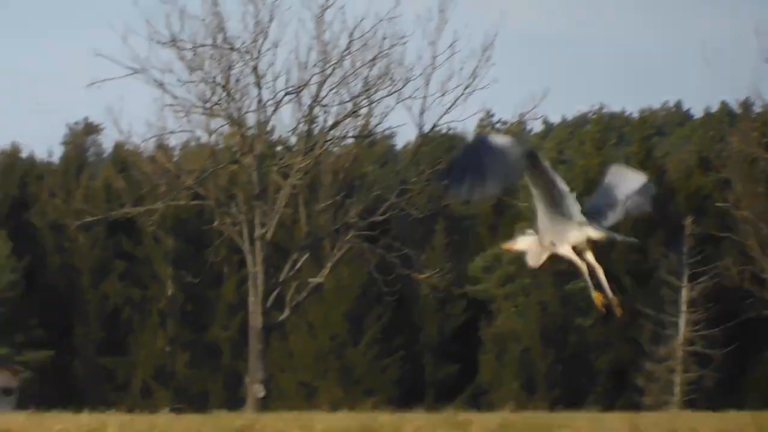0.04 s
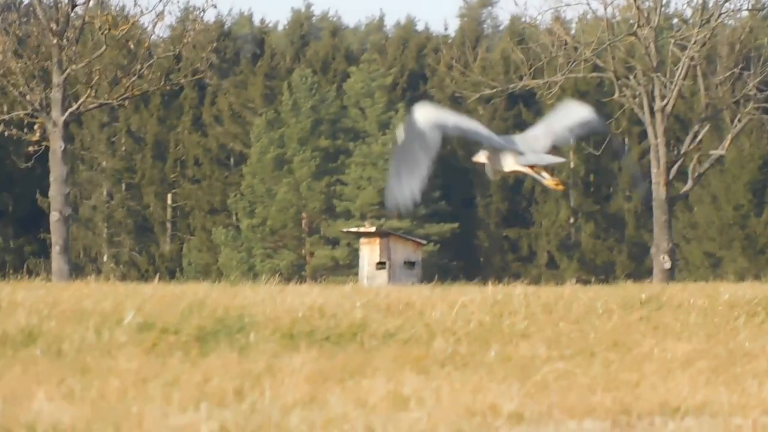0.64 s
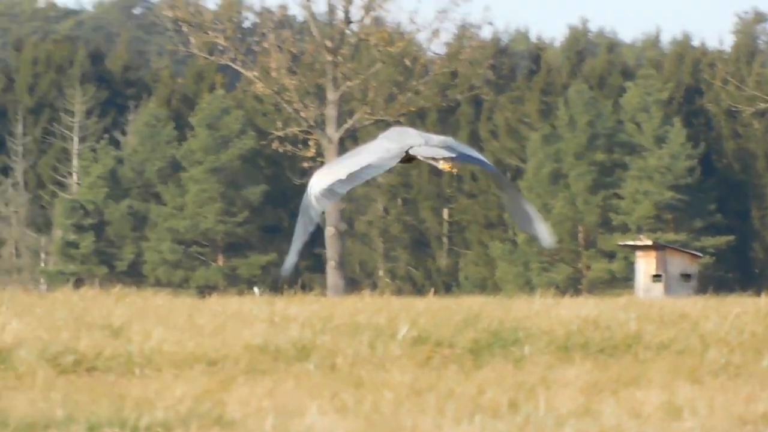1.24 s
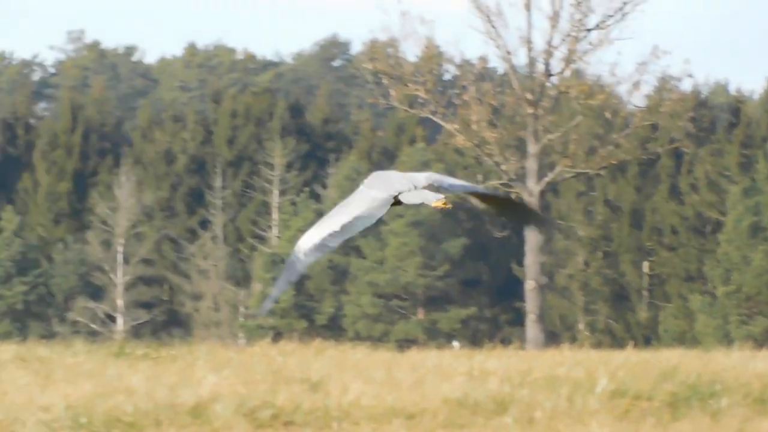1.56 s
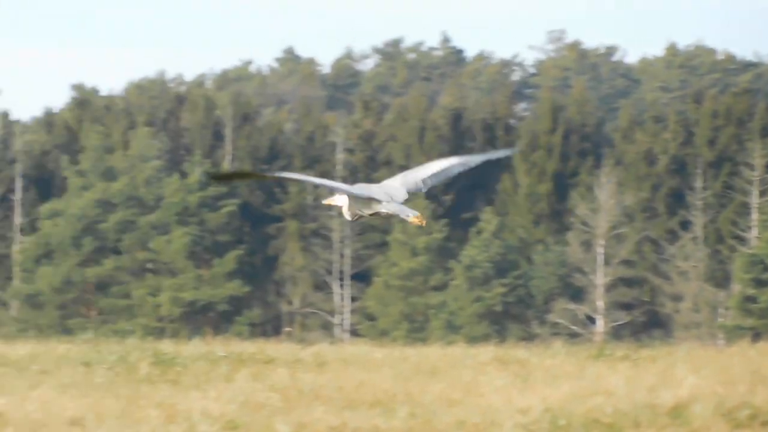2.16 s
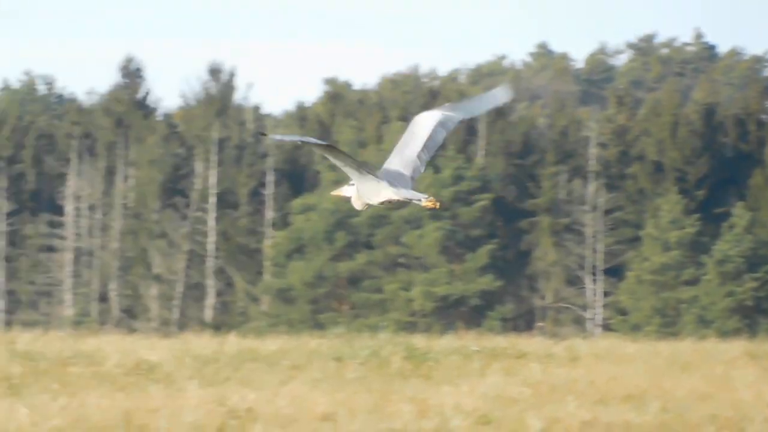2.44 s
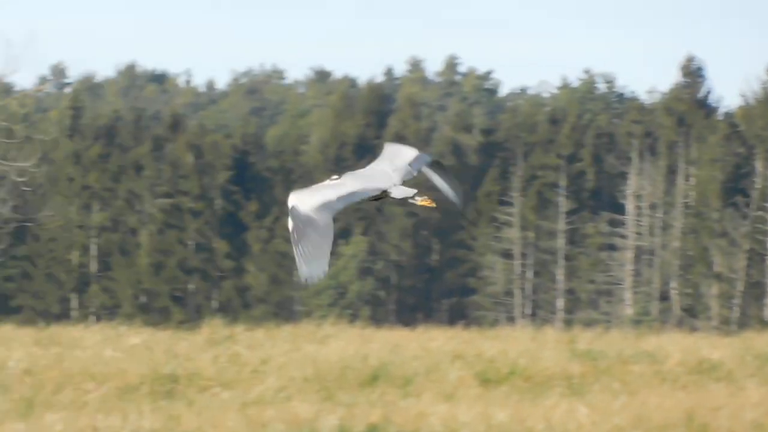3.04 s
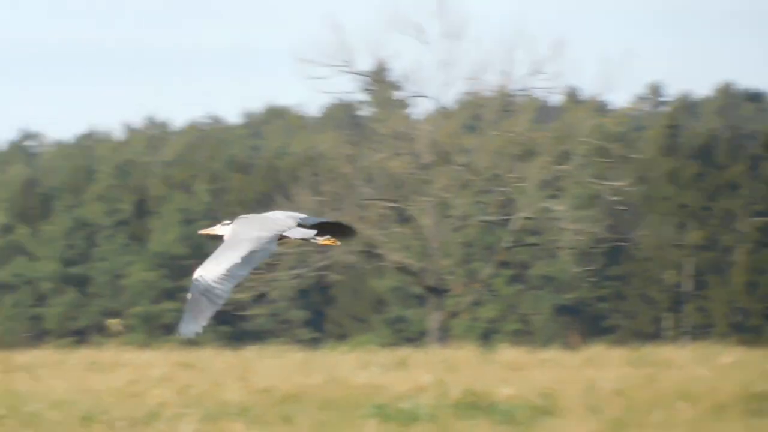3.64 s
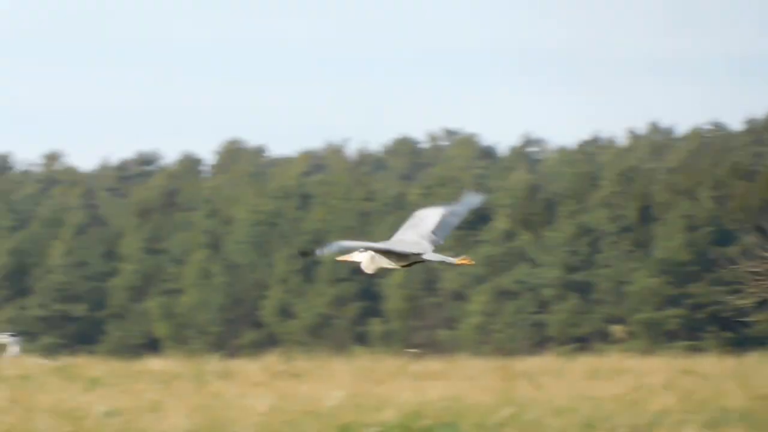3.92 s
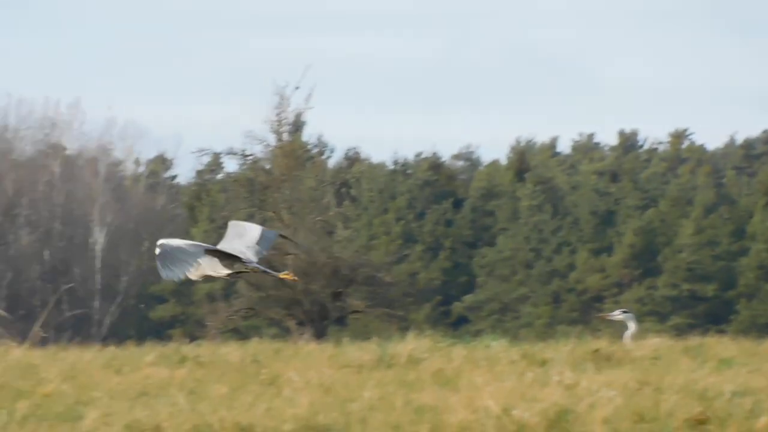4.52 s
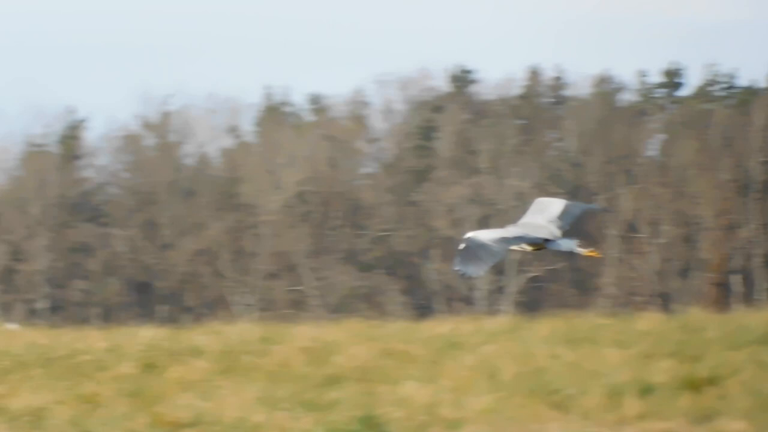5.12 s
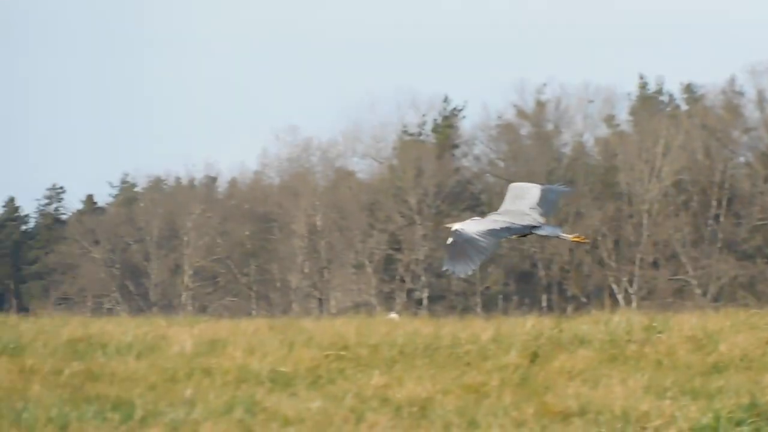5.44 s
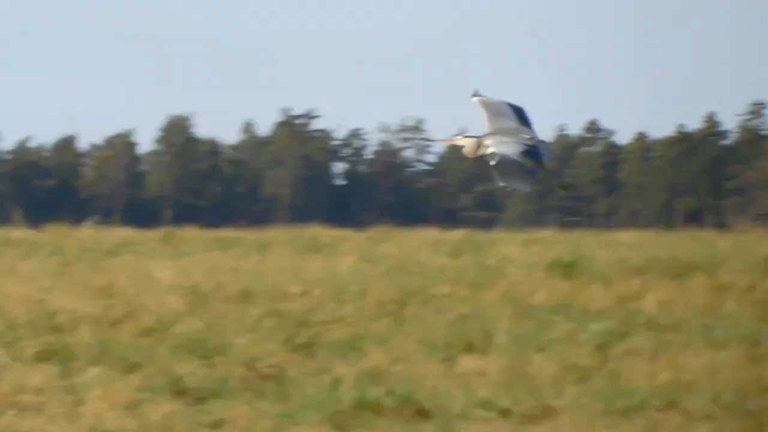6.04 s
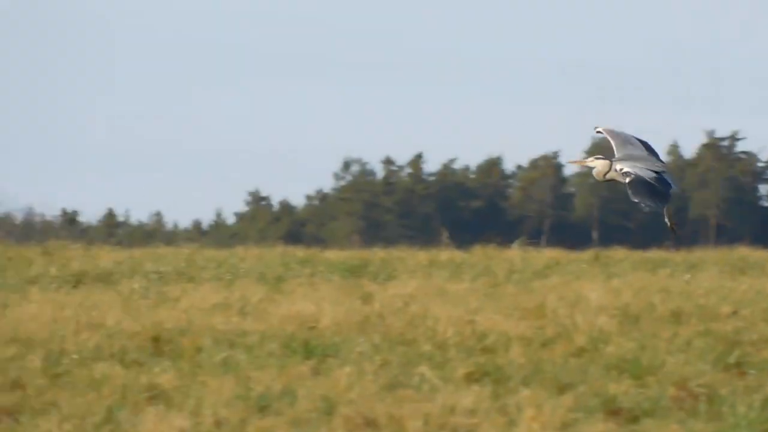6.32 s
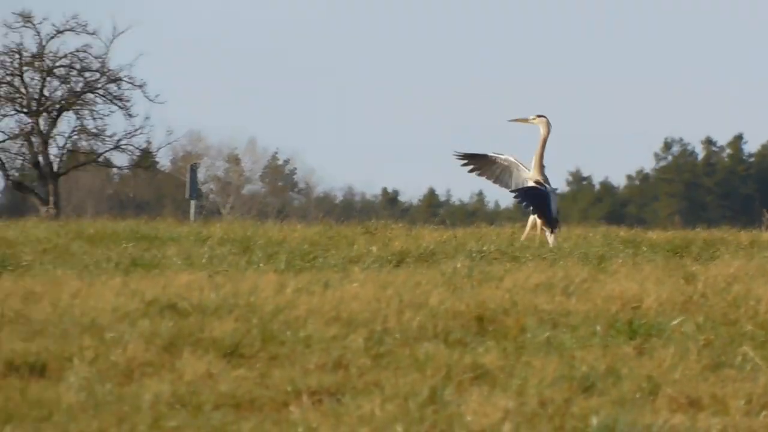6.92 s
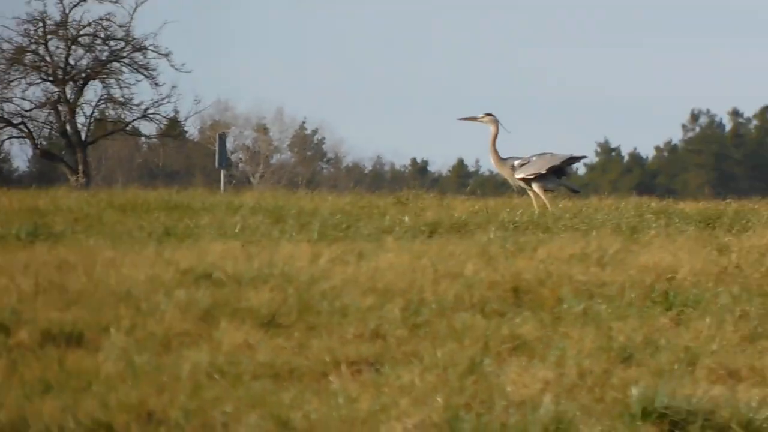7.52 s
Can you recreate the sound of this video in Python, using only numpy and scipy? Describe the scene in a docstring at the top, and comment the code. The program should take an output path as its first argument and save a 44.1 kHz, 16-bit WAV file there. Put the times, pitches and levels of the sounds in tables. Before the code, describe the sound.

Irregular gusts buffet a microphone in an open field, making a low sputtering rumble with brief dull pops and a trace of hiss. The wind starts mostly on the left, grows strongest on both sides around the middle, eases briefly and then returns. Behind it lie an even, soft rush of far-off air and the faint steady hum of a small motor near the microphone.

```python
"""Open grassland, heard through the two microphone ports of a camera standing in gusty wind.
Far off is the soft rush of the field; close by, a faint steady hum, likely the camera's lens motor.
Gusts buffet the ports directly, the left more than the right, each a low turbulent rumble that
brightens as it grows. Single eddies hit a port as short dull pops.
A faint grainy treble hiss swells with the loudest rumble and pops."""
import sys
import numpy as np
from scipy import signal
from scipy.fft import rfft, irfft
from scipy.io import wavfile
from scipy.ndimage import uniform_filter1d

SR = 44100
rng = np.random.default_rng(int(sys.argv[2]) if len(sys.argv) > 2 else 0)


def wrap_up_sound(samples):
    """Save the sound to the file named by the first command line argument, as 16-bit audio."""
    columns = np.atleast_2d(samples).T
    # keep every value between -1 and 1, then stretch to whole-number steps
    tamed = np.clip(columns, -1, 1)
    steps = np.round(tamed * 32767).astype(np.int16)
    wavfile.write(sys.argv[1], SR, steps)


N = 342657
TIME = np.arange(N) / SR
FREQS = np.maximum(np.fft.rfftfreq(N, 1 / SR), 1)


def undb(db):
    """Decibels to gain."""
    return 10 ** (np.asarray(db) / 20)


def spectrum(table):
    """Gain at FREQS from rows of freq_hz, level_db, joined on a log-frequency axis."""
    hz, db = np.transpose(table)
    return undb(np.interp(np.log(FREQS), np.log(hz), db))


def curve(table):
    """Rows of time_s, value joined by straight lines."""
    return np.interp(TIME, *np.transpose(table))


def noise(gain):
    """Noise with the given amplitude per root Hz."""
    return irfft(rfft(rng.standard_normal(N)) * gain, N) * np.sqrt(SR / 2)


def walk(rate_hz):
    """Smooth random motion of spread 1."""
    motion = noise(np.exp(-(FREQS / rate_hz) ** 2))
    return motion / motion.std()


# The distant field together with the microphone's own hiss: freq_hz, level_db_per_hz
FIELD_SPECTRUM = [(20, -74.5), (150, -108.5), (450, -100), (700, -91.5), (1000, -90.5), (1500, -93),
                  (2300, -100), (3000, -105), (4500, -110), (9000, -116), (16000, -120)]


def field():
    """Even rush of distant air over grass and trees, unrelated at the two ports."""
    return np.array([noise(spectrum(FIELD_SPECTRUM)) for _ in range(2)])


# Resonances in the camera, before waver and swell:
# pitch_hz, width_hz, left_db_per_hz, right_db_per_hz, phase_between_ports_rad
HUM_RESONANCES = [(1606, 16, -104, -81.5, 0), (1727, 114, -100, -88.5, 0.26), (1910, 88, -104, -96, 2),
                  (2048, 80, -85.5, -88.5, -1.5), (2200, 30, -92.5, -99, -5),
                  (2450, 125, -93.5, -97.5, -1.74), (2722, 136, -97.5, -100, -5),
                  (3100, 38, -103, -112, 6.5), (3390, 540, -106, -114, -1.5)]
# Contour of the whirr; the upper resonances follow a share of its swing: time_s, contour_db
WHIRR_CONTOUR = [(0.1, -68), (0.16, -61), (0.39, -85), (0.52, -65.5), (0.99, -84.5), (1.52, -66.5),
                 (3.23, -69.5), (3.91, -59.5), (4.27, -79), (4.37, -64.5), (6.85, -71.5), (7.7, -64)]


def motor_hum(waver_db=0.5, upper_hz=2300, upper_lift_db=2.0, whirr_share=0.45):
    """A small motor near the microphones rings narrow resonances, most out of step at the two ports."""
    whirr_db = curve(WHIRR_CONTOUR)
    swell_db = upper_lift_db + whirr_share * (whirr_db - whirr_db.mean())
    hum = 0
    for pitch_hz, width_hz, left_db, right_db, phase_rad in HUM_RESONANCES:
        resonance = 1 / (1 + ((FREQS - pitch_hz) / (0.71 * width_hz)) ** 2)
        ring = signal.hilbert(noise(resonance))  # complex, so its phase can be turned
        ring *= undb(waver_db * walk(1.1) + (pitch_hz > upper_hz) * swell_db)
        hum = hum + np.real([undb(left_db) * ring, undb(right_db) * ring * np.exp(1j * phase_rad)])
    return hum


# Gusts arriving at the camera: hold_start_s, hold_s, left_strength_db, right_strength_db
GUSTS = [(0.271, 0.02, -54, -76), (0.433, 0.0076, -39.5, -55), (0.507, 0.094, -37, -51),
         (0.632, 0.25, -34.5, -57), (0.974, 0.055, -49.5, -76), (1.133, 0.078, -38.5, -53),
         (1.338, 0.19, -43.5, -53.5), (1.605, 0.17, -49, -66), (1.892, 0.0094, -31.5, -47),
         (1.986, 0.29, -47.5, -61.5), (2.444, 0.26, -46, -49), (2.789, 0.051, -32, -37),
         (2.894, .10, -31.5, -36.5), (3.024, 0.023, -44, -37), (3.154, 0.011, -33, -36.5),
         (3.208, 0.15, -33, -35.5), (3.437, 0.024, -28.5, -32), (3.549, 0.029, -37.5, -47),
         (3.647, 0.012, -26, -49), (3.73, 0.017, -25.5, -30.5), (3.807, 0.026, -45, -36),
         (3.895, 0.057, -31.5, -54), (4.121, 0.082, -29, -38.5), (4.219, 0.23, -41, -46),
         (4.57, 0.047, -36.5, -39), (4.657, 0.18, -47.5, -60), (4.852, 0.024, -42.5, -37),
         (4.956, 0.43, -47, -62.5), (5.32, 0.16, -36.5, -47.5), (5.50, .15, -30, -29),
         (5.669, 0.081, -36.5, -45.5), (5.81, 0.13, -42.5, -51), (6.013, 0.31, -48, -52.5),
         (6.262, 0.032, -26, -48), (6.342, 0.24, -40, -43.5), (6.52, 0.095, -31.5, -42),
         (6.674, 0.089, -32.5, -30.5), (6.805, 0.015, -28, -45), (6.86, 0.33, -38, -52.5),
         (7.076, .16, -33.5, -40), (7.273, 0.18, -36.5, -37), (7.479, 0.086, -30, -29),
         (7.592, 0.048, -41, -42.5), (7.706, 0.057, -48, -51.5)]


def gusts(port, breeze_db=-65, attack_s=0.017, release_s=0.016):
    """Wind strength at one port: every gust builds up, holds and dies away above a light breeze."""
    power = undb(breeze_db) ** 2
    for hold_start_s, hold_s, *strength_db in GUSTS:
        t = TIME - hold_start_s
        envelope = np.exp(np.minimum(t, 0) / attack_s - np.maximum(t - hold_s, 0) / release_s)
        power = power + (envelope * undb(strength_db[port])) ** 2
    return np.sqrt(power)


# A strong gust right on the microphone, before bass level and treble roll-off: freq_hz, level_db_per_hz
RUMBLE_SPECTRUM = [(15, -86), (43, -60.5), (100, -61), (200, -57.5), (300, -55), (500, -53), (1000, -58.5),
                   (3000, -72.5)]
# Slow rise and fall of the rumble's deepest bass: time_s, gain_db
BASS_LEVEL = [(0, -7.5), (2.1, -2), (4.0, -3), (6.0, -7.5), (7.7, -12.5)]


def rumble(gust_db, growth=0.47, corner_hz=610, db_per_octave=15, churn_db=5.0, sputter_db=3.0):
    """Turbulence on one port: faster air is louder and makes smaller eddies, so the roll-off moves up."""
    speed_db = gust_db + churn_db * walk(rate_hz=120) + sputter_db * walk(rate_hz=35)
    moving_corner_hz = corner_hz * 2 ** (speed_db / db_per_octave)
    pressure = rfft(noise(spectrum(RUMBLE_SPECTRUM)))
    bass_db = curve(BASS_LEVEL)
    turbulence = 0
    for band_hz in 16 * 2 ** np.arange(0, 8, .5):
        share = np.maximum(1 - 2 * np.abs(np.log2(FREQS / band_hz)), 0)  # overlapping half-octave bands
        band = irfft(pressure * share, N)
        band *= undb(bass_db / (1 + (band_hz / 110) ** 2))  # acts mostly below 110 Hz
        turbulence = turbulence + band / (1 + (band_hz / moving_corner_hz) ** 3) ** 1.245
    return turbulence * undb(growth * speed_db)


# The strongest eddies striking a port: time_s, peak_db, pitch_hz, port (0 left, 1 right)
EDDY_STRIKES = [(0.427, -13.5, 500, 0), (0.533, -14, 460, 0), (0.552, -21, 505, 0), (0.58, -13.5, 650, 0),
                (0.592, -19.5, 770, 0), (0.698, -19, 467, 0), (0.73, -21, 450, 0), (0.786, -8.5, 468, 0),
                (1.115, -20, 413, 0), (1.344, -18, 525, 0), (1.374, -20, 407, 0), (1.439, -20.5, 495, 0),
                (1.613, -23, 476, 0), (1.683, -18.5, 476, 0), (1.895, -14.5, 505, 0), (1.913, -14, 433, 0),
                (1.982, -22.5, 370, 0), (2.037, -25, 424, 0), (2.124, -18.5, 430, 0),
                (2.174, -20.5, 477, 0), (2.24, -29, 540, 0), (2.449, -27, 483, 0), (2.508, -15.5, 410, 0),
                (2.534, -11, 576, 0), (2.583, -20.5, 535, 0), (2.619, -21.5, 500, 0),
                (2.795, -20.5, 450, 0), (2.949, -15.5, 380, 0), (2.989, -9.5, 490, 0),
                (2.997, -13.5, 590, 1), (3.039, -21, 513, 1), (3.144, -10, 700, 0), (3.218, -14.5, 395, 0),
                (3.247, -8.5, 630, 0), (3.359, -19, 770, 1), (3.433, -17.5, 460, 0), (3.461, -26, 458, 0),
                (3.571, -20, 390, 0), (3.64, -18, 565, 0), (3.676, -18, 650, 0), (3.708, -12.5, 750, 1),
                (3.713, -17, 514, 0), (3.892, -15, 400, 0), (4.191, -13.5, 495, 0), (4.395, -16, 554, 0),
                (4.621, -11.5, 480, 0), (4.638, -14.5, 400, 0), (5.017, -26, 483, 0),
                (5.471, -19.5, 490, 0), (5.511, -12, 720, 0), (5.563, -13, 605, 0), (5.616, -18, 500, 1),
                (6.215, -13.5, 620, 0), (6.274, -8.5, 834, 0), (6.537, -12.5, 550, 0), (6.56, -14, 485, 0),
                (6.601, -9.5, 724, 0), (6.614, -9, 574, 0), (6.799, -16, 766, 0), (6.872, -19, 744, 0),
                (6.905, -13, 506, 0), (6.967, -24.5, 523, 0), (7.081, -13.5, 530, 0),
                (7.212, -21.5, 790, 0), (7.716, -22.5, 380, 0)]


def eddies(port, sharpness=4.9, skew_rad=0.37, wake_db=-18, wake_growth=0.73, wake_s=0.0084):
    """An eddy sweeps the port: brief suction between two lobes of overpressure, in a wake of rough air."""
    pops, wake = np.zeros(N), np.zeros(N)
    leans = rng.uniform(-1.4, 1, len(EDDY_STRIKES))  # each pop is a little lopsided
    for (time_s, peak_db, pitch_hz, side), lean in zip(EDDY_STRIKES, leans):
        if round(side) == port:
            near = np.abs(TIME - time_s) < .02
            t = TIME[near] - time_s
            turn = 2 * np.pi * pitch_hz * t / (sharpness + .5)
            lobes = np.exp(1j * skew_rad * lean) / (1 - 1j * turn) ** (sharpness + 1)
            pops[near] -= undb(peak_db) * lobes.real
            wake[near] += undb(wake_growth * peak_db + wake_db) * np.exp(-(t / wake_s) ** 2)
    return pops, wake


def treble_hiss(drive, edge_hz=6500, follow=0.76, window_s=0.042, grain_db=3.0):
    """A faint grainy treble hiss that swells with the loudest rumble and pops."""
    power = np.maximum(uniform_filter1d(drive ** 2, int(window_s * SR) + 1), 1e-12)
    treble = FREQS / np.hypot(FREQS, edge_hz)
    hiss = noise(undb(-81) / 2 * treble)
    grain = undb(grain_db * walk(rate_hz=300))
    return hiss * power ** (follow / 2) * grain


def port_sound(port, strong_gust_db=-28.5):
    """One port: the rumble of gusts and eddy wakes, the pops, and a hiss that follows their level."""
    pops, wake = eddies(port)
    strength_db = 20 * np.log10(np.hypot(gusts(port), wake))
    flow = rumble(strength_db - strong_gust_db)
    hiss_drive = undb(-1.5) * flow + undb(6) * pops  # the hiss follows pops more than rumble
    return flow + pops + treble_hiss(hiss_drive)


def scene():
    """Left and right ports each feel their own turbulence, over the far field and the near hum."""
    return np.array([port_sound(port) for port in range(2)]) + field() + motor_hum()


def record(dry):
    """The camera cuts the treble steeply above 15.8 kHz."""
    lowpass = signal.ellip(10, .1, 70, 15800, fs=SR, output="sos")
    return signal.sosfilt(lowpass, dry)


dry = scene()
out = record(dry)
wrap_up_sound(out)
```